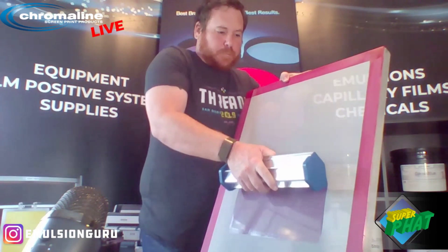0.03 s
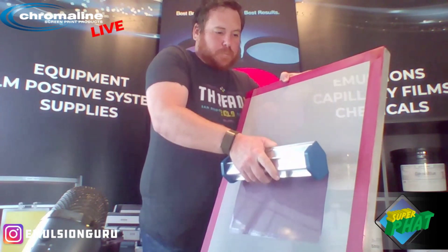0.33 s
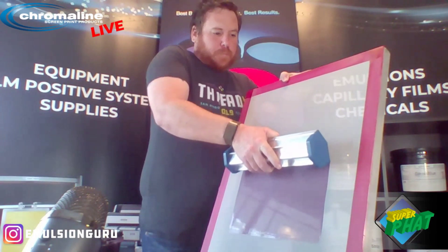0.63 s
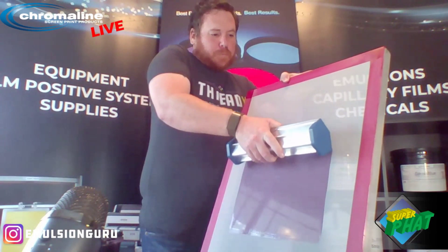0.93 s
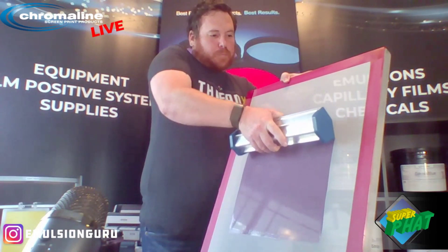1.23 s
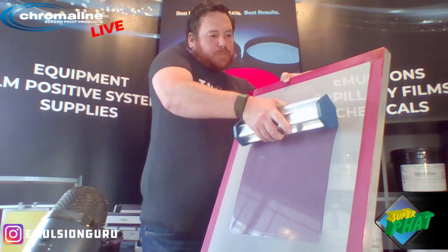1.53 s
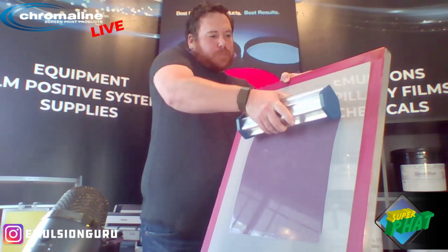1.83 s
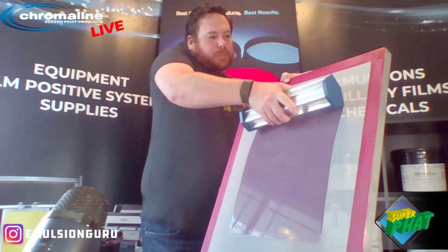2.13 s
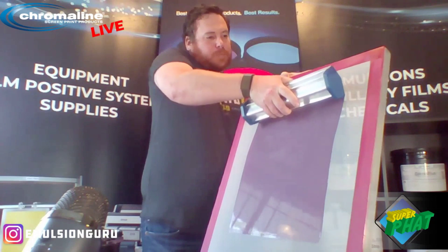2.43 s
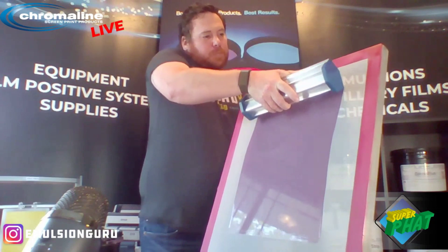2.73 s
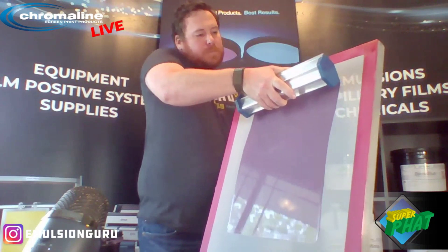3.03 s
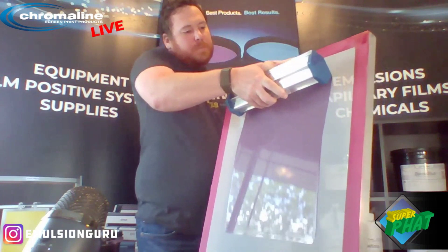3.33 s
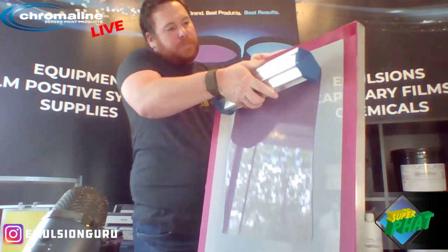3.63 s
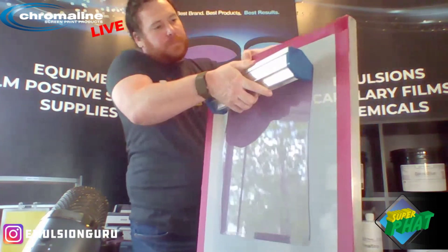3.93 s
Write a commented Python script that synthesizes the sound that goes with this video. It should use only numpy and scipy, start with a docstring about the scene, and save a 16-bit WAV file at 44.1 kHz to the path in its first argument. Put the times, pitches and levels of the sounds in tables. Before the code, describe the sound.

A metal trough scrapes up a taut mesh screen, stops, then bumps it softly.

```python
"""A dense, hissing rasp: a metal coating trough is drawn up a taut mesh screen in a workshop.
Its edge catches on the threads, rings the trough and drums the mesh; now and then it sticks and slips,
chattering on one resonance. At 3 s it stops at the top of the frame, then bumps the screen softly and
scuffs it four times over quiet room noise. One microphone hears it all, the same in both ears."""
import sys
import numpy as np
from scipy import signal
from scipy.fft import rfft, irfft
from scipy.io import wavfile
from scipy.ndimage import uniform_filter1d

SR = 44100
rng = np.random.default_rng(int(sys.argv[2]) if len(sys.argv) > 2 else 0)


def wav_out(sig):
    """Save sig, one row per channel (or a flat mono array), as 16-bit PCM at SR to the path in sys.argv[1]."""
    wavfile.write(sys.argv[1], SR, np.round(np.clip(np.atleast_2d(sig).T, -1, 1) * 32767).astype(np.int16))


N = 176400
T, FREQS = np.arange(N) / SR, np.fft.rfftfreq(N, 1 / SR)


def amp(db):
    """Decibels to gain."""
    return 10 ** (np.asarray(db) / 20)


def unit(x):
    """Scales to rms 1."""
    return x / np.sqrt(np.mean(x ** 2) + 1e-20)


def colour(points, hz):
    """Reads a spectrum in dB on a log-frequency axis."""
    f, db = np.transpose(points)
    return np.interp(np.log(hz + 1), np.log(f + 1), db)


def drift(rate_hz):
    """A random wander, mostly slower than rate_hz; rms 1."""
    return unit(irfft(rfft(rng.standard_normal(N)) / (1 + (FREQS / rate_hz) ** 4), N))


def swell(start, rise, t60):
    """A soft rise, then a free decay."""
    attack = np.sin(np.pi / 2 * np.clip((T - start) / rise, 0, 1)) ** 2
    return attack * np.exp(-np.log(1000) * np.maximum(T - start - rise, 0) / t60)


def friction(snaps_per_s=2500, spread_db=1.5, snap_share=.32):
    """The edge catches thread after thread: dense rubbing with sharper snaps."""
    strength = amp(spread_db * np.minimum(rng.exponential(1, N), 5))
    snaps = strength * rng.choice([-1, 1], N) * (rng.random(N) < snaps_per_s / SR)
    return np.sqrt(snap_share) * unit(snaps) + np.sqrt(1 - snap_share) * rng.standard_normal(N)


def resonate(rub, spectrum, modes, band_hz, size=2048):
    """Passes friction through resonances and the mesh's sinking overtones; rms 1 inside band_hz."""
    framing = dict(fs=SR, nperseg=size, noverlap=size * 3 // 4)
    hz, t, spectra = signal.stft(rub, **framing)
    f = hz[:, None]
    near_top = np.interp(t, (1.74, 2.44), (0, 1))  # the edge nears the frame between these seconds

    def patches(width_hz, length_s):
        """Random bright and dull spots in frequency and time."""
        across = uniform_filter1d(rng.standard_normal(spectra.shape), max(1, round(width_hz / hz[1])), 0)
        return unit(uniform_filter1d(across, max(1, round(length_s / t[1])), 1))

    span_hz = 296 / (1 + .57 * t)  # overtones sink as the wet span of mesh lengthens
    db = colour(spectrum, f) + 4.5 * np.cos(2 * np.pi * f / span_hz) / (1 + (f / 1600) ** 2)
    for centre, width, mid_db, top_db in modes:
        grip_db = 2.2 * np.interp(t, T, drift(4))  # each resonance swells and fades as the grip shifts
        lift_db = mid_db + (top_db - mid_db) * near_top + grip_db
        db += lift_db / (1 + 2 * ((f - centre) / width) ** 2) ** 2
    frame_echo_s = .00168  # a reflection off the frame combs the hiss
    db += 2.2 * near_top * np.cos(2 * np.pi * f * frame_echo_s) * (f > 4500)
    db += 2.6 * patches(width_hz=260, length_s=.06) / (1 + (f / 5000) ** 2)
    # countless small modes shift with the edge and stand out more as it slows near the frame
    db += (1.9 + 1.3 * near_top) * patches(width_hz=55, length_s=.2) / np.sqrt(1 + (f / 14000) ** 4)
    in_band = (f > band_hz[0]) & (f < band_hz[1])
    gain = amp(db) / np.sqrt((amp(db) ** 2 * in_band).mean(0))
    return signal.istft(spectra * gain, **framing)[1][:N]


# broad colour of the rasp (f/Hz, relative level/dB)
RASP_SPECTRUM = [(500, -56.5), (820, -17.5), (950, -2), (1270, -5), (1600, 0.5), (2250, 2.5), (2700, -0.5),
                 (3300, -0.5), (3780, -2.5), (4000, -9), (4550, -11.5), (5400, -33.5), (8000, -55.5)]
# resonances of the trough (f/Hz, width/Hz, lift in mid-screen/dB, lift near the top/dB)
TROUGH_MODES = [(951, 40, 2, 11.5), (1038, 60, 3.5, 8), (1148, 99, 4, 16.5), (1383, 10, 3, 13),
                (1479, 48, 7.5, 13), (1807, 27, 6, 1), (1835, 125, -2.5, 17), (2005, 49, -6, 10.5),
                (2084, 37, 1.5, 21.5), (2165, 50, 2.5, 9), (2254, 41, 7.5, 15.5), (2503, 21.4, 12, 12),
                (2800, 30, 0, 7), (3096, 27, 9, 6.5), (3417, 27, 9.5, 12.5), (3620, 127, 3, 7),
                (3830, 26, 12, 3), (4190, 68, 10.5, 10.5), (4642, 47, 11, 9), (5200, 69, 24, 12)]


def trough_rasp(rub):
    """The rubbing edge rings the metal trough."""
    return resonate(rub, RASP_SPECTRUM, TROUGH_MODES, band_hz=(900, 4000), size=4096)


# broad colour of the hiss (f/Hz, relative level/dB)
HISS_SPECTRUM = [(2500, -28.5), (4800, -2), (5900, -2), (6500, 1.5), (7050, 3.5), (7900, -4), (9200, -4),
                 (9700, -5.5), (11900, -5), (12300, -8.5), (15700, -10.5)]


def thread_hiss(rub):
    """The threads hiss as the edge slides over them."""
    return resonate(rub, HISS_SPECTRUM, [], band_hz=(5000, 15000))


# broad colour of the drumming (f/Hz, relative level/dB)
DRUM_SPECTRUM = [(30, -53), (70, -39), (150, -37.5), (240, -17.5), (330, -12), (400, -1.5), (490, -1),
                 (650, 0.5), (850, -5.5), (1100, -46), (2000, -62)]
# resonances of the mesh (f/Hz, width/Hz, lift in mid-screen/dB, lift near the top/dB)
MESH_MODES = [(196, 49, 10.5, 27), (374.7, 35, 7.5, 18), (483, 59, 3.5, 6.5), (499, 130, 1.5, -19.5),
              (599, 33, -3.5, 2.5)]


def mesh_drum(rub):
    """The taut mesh answers the edge like a drumhead."""
    return resonate(rub, DRUM_SPECTRUM, MESH_MODES, band_hz=(450, 850))


# the stroke at the microphone (t/s, rasp level/dB, hiss level/dB, drum level/dB)
STROKE_LEVELS = [(0.0, -29, -42.5, -43), (0.24, -33, -45.5, -47), (0.541, -32, -42.5, -42),
                 (0.63, -33, -44.5, -53), (0.76, -31.5, -43, -47.5), (0.88, -33.5, -45, -42),
                 (1.04, -32.5, -43.5, -47), (1.5, -32.5, -44.5, -46.5), (1.9, -33.5, -46, -54.5),
                 (2.07, -35, -46.5, -52.5), (2.2, -33.5, -45, -62), (2.265, -31.5, -44.5, -56),
                 (2.38, -35.3, -51.5, -52.5), (2.555, -38, -54, -61.5), (2.615, -39.5, -56, -60),
                 (2.665, -34.5, -52.5, -60), (2.715, -37.5, -56, -59), (2.782, -44.5, -67, -60.5),
                 (2.81, -40.5, -56.5, -61), (2.846, -38, -56, -56.5), (2.885, -40, -55, -64),
                 (2.915, -35.5, -51.5, -57), (2.99, -63, -89, -78)]


def stroke(stop_s=2.99, stop_db_per_s=332):
    """One pull up the screen: the same juddering friction drives rasp, hiss and drumming."""
    times, *levels = np.transpose(STROKE_LEVELS)
    rasp_db, hiss_db, drum_db = (np.interp(T, times, db) for db in levels)
    rub, judder = friction(), drift(44.7)
    rasp = trough_rasp(rub) * amp(rasp_db + .27 * judder)
    drum = mesh_drum(rub) * amp(drum_db + 1.5 * judder)
    hiss = thread_hiss(rub) * amp(hiss_db + .3 * judder + .5 * drift(11))
    return (rasp + hiss + drum) * amp(-stop_db_per_s * np.maximum(T - stop_s, 0))


# brief tones that stand out of the stroke (middle t/s, length/s, f/Hz, level/dB)
CHATTER_TONES = [(0.019, 0.11, 1396, -33), (0.034, 0.081, 1533, -34), (.103, .045, 1477, -32.5),
                 (.23, 0.073, 1478, -35), (0.083, 0.62, 370.7, -45.5), (0.238, 0.084, 371.7, -35),
                 (0.324, 0.072, 366.6, -34.5), (0.337, .14, 289.6, -44.5), (0.387, .09, 441.6, -42.5),
                 (0.391, .34, 202, -56.5), (0.548, .06, 434, -41.5), (0.781, 0.054, 1007, -32.5),
                 (0.888, 0.09, 364.6, -32.5), (0.942, .07, 358, -34), (0.897, .14, 732, -42),
                 (1.04, 0.097, 933, -40), (1.262, 0.12, 378.8, -38), (1.477, 0.39, 1022, -44.5),
                 (1.499, .12, 2272, -40), (1.98, 0.065, 2570, -40), (2.018, 0.11, 370.6, -42.5),
                 (2.08, 0.035, 338, -45.5), (2.238, 0.22, 369.7, -45.5), (2.255, 0.11, 2116, -35.5),
                 (2.392, 0.072, 1145, -38), (2.395, 0.068, 361, -49.5), (2.455, .04, 2094, -37),
                 (2.487, 0.056, 937, -43), (2.71, 0.14, 204.4, -60.5), (2.742, 0.049, 994, -40.5),
                 (2.844, .03, 1165, -33), (2.863, 0.36, 434.3, -55.5), (2.927, 0.11, 199, -57.5)]


def chatter():
    """The edge sticks and slips on one resonance: its pitch wanders and grit shakes its strength."""
    out, wander_hz, grit = np.zeros(N), 8 * drift(83), .33 * drift(150)
    for middle, length, hz, db in CHATTER_TONES:
        on = abs(T - middle) < length / 2
        stretch = (np.flatnonzero(on) + rng.integers(N)) % N  # each tone wanders in its own way
        cycles = np.cumsum(hz + wander_hz[stretch]) / SR
        roughness = 1 + min(hz / 1000, 1) * grit[stretch]
        arch = np.cos(np.pi * (T[on] - middle) / length)
        out[on] += np.sqrt(2) * amp(db) * arch * roughness * np.sin(2 * np.pi * cycles)
    return out


# colour of the workshop's background (f/Hz, relative level/dB)
ROOM_TONE_SPECTRUM = [(25, -15), (70, -3.5), (105, 12), (150, -1.5), (280, 6.5), (650, -1.5), (2000, -2.5),
                      (3800, -7.5), (5800, -18), (7500, -13), (9700, -10.5), (12000, -12), (15700, -15.5)]
# its strength at the microphone (t/s, level/dB)
ROOM_TONE_LEVELS = [(2.9, -65.5), (3.12, -73), (3.16, -66), (3.6, -69), (3.9, -68.5), (4, -74)]


def room_tone(hum_hz=118, hum_db=-77):
    """Quiet noise and a wavering hum, in the clear once the stroke stops."""
    noise = unit(irfft(rfft(rng.standard_normal(N)) * amp(colour(ROOM_TONE_SPECTRUM, FREQS)), N))
    hum = amp(hum_db) * np.sin(2 * np.pi * hum_hz * T + drift(10))
    return noise * amp(np.interp(T, *np.transpose(ROOM_TONE_LEVELS))) + hum


def rattle_depth(hz):
    """Radians by which the rubbing edge shakes a tone's phase; high tones shake most."""
    return 1.3 * min(hz / 1500, 1)


# broad colour of a scuff (f/Hz, relative level/dB)
SCUFF_SPECTRUM = [(80, -6), (300, 13), (700, 6), (1150, -1), (1500, 2), (2200, 1), (2700, 3), (3700, -2),
                  (4500, -4), (5200, -17), (15000, -25)]
# light touches on the screen (t/s, rise/s, t60/s, rub level/dB, ring f/Hz, ring level/dB)
SCUFF_TOUCHES = [(3.135, 0.037, 0.26, -59, 4360, -72), (3.455, 0.024, 0.19, -64, 3620, -64),
                 (3.722, 0.044, 0.24, -58, 446, -57.5), (3.945, 0.018, .06, -63.5, 974, -82)]


def scuffs():
    """Short light rubs through the trough's resonances, each with one ringing tone."""
    rub = unit(resonate(friction(), SCUFF_SPECTRUM, TROUGH_MODES, band_hz=(100, 5000)))
    out, waver = np.zeros(N), drift(110)
    for start, rise, t60, rub_db, hz, ring_db in SCUFF_TOUCHES:
        ring = np.sin(2 * np.pi * hz * T + rattle_depth(hz) * waver)
        out += swell(start, rise, t60) * (amp(rub_db) * rub + amp(ring_db) * ring)
    return out


# modes stirred by the bump (f/Hz, delay/s, level/dB, t60/s)
BUMP_MODES = [(115, 0, -59, .2), (255, 0.006, -42.5, 0.04), (206, 0.024, -47, 0.076),
              (313, 0.017, -52, .08), (600, 0.017, -62.5, 0.14), (930, 0.009, -63, .14),
              (1210, 0.011, -58, 0.2), (1760, 0.009, -57, 0.15), (2120, .024, -51, .14),
              (2870, 0.02, -56, .14), (1620, 0.048, -55, 0.14)]


def bump(start_s=3.139, rise_s=.029):
    """The trough tips against the mesh: a low thud, then its metal rings with a slight rattle."""
    out = np.zeros(N)
    for hz, delay, db, t60 in BUMP_MODES:
        rattle = rattle_depth(hz) * drift(90)
        ring = np.sin(2 * np.pi * (hz * T + rng.random()) + rattle)
        out += amp(db) * swell(start_s + delay, rise_s, t60) * ring
    return out


def workshop(direct, t60_s=.3, tail_db=-11, echoes_per_s=2000):
    """Heard from nearby: the direct sound leads, and sparse, weaker reflections follow from 4 ms on."""
    t = T[:SR // 2]
    echoes = rng.standard_normal(len(t)) * (rng.random(len(t)) < echoes_per_s / SR) * (t > .004)
    tail = echoes * np.exp(-np.log(1000) * t / t60_s)
    return direct + amp(tail_db) * signal.fftconvolve(direct, tail / np.linalg.norm(tail))[:N]


def scene():
    """One microphone in the workshop feeds both channels."""
    mono = stroke() + room_tone() + workshop(chatter() + scuffs() + bump())
    return np.array([mono, mono])


def record(dry):
    """The recorder cuts off the top of the treble."""
    lowpass = signal.firwin(601, cutoff=15750, window=("kaiser", 9), fs=SR)
    return signal.oaconvolve(dry, lowpass[None], "same", axes=1)


dry = scene()
out = record(dry)
wav_out(out)
```